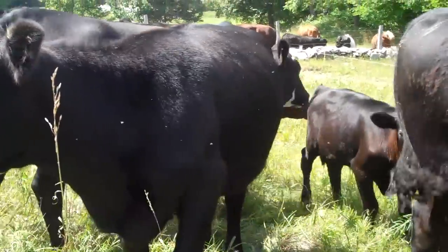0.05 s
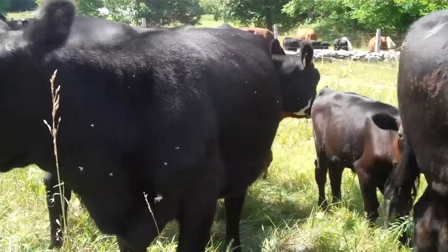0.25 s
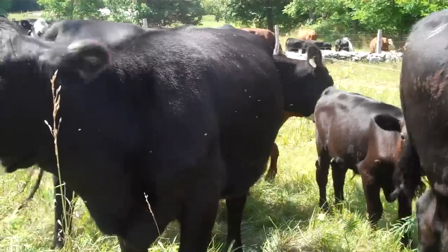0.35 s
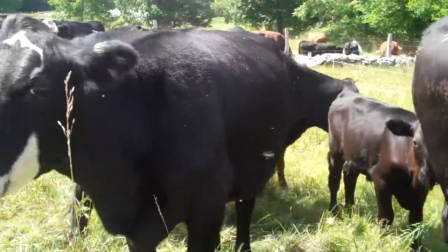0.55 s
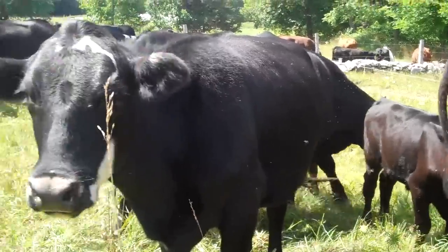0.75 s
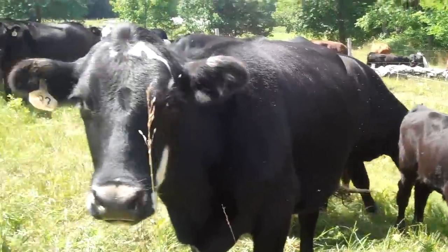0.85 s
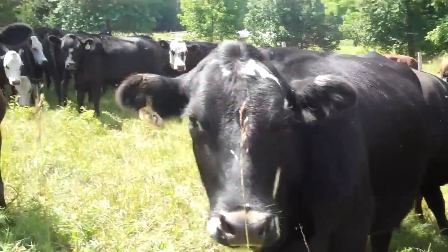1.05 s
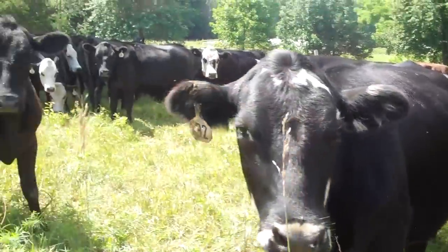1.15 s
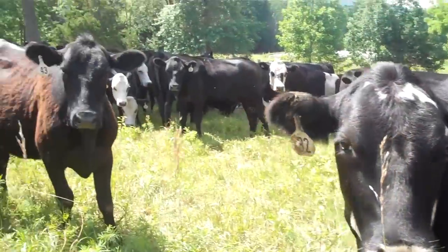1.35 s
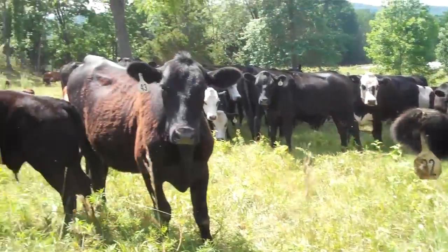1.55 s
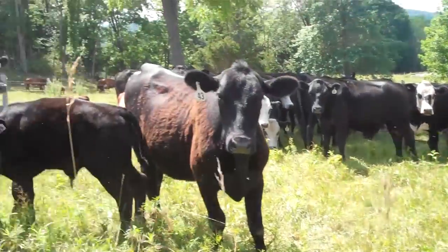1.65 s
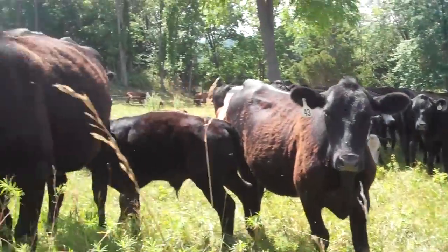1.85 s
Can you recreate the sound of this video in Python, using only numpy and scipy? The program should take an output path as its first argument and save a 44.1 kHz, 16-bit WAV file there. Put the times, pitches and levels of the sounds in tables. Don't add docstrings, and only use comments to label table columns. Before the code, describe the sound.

A close cow moos once, starting low and nasal, opening into a loud held note, then falling with a creak; a second cow bellows high and breaks to a hum; open pasture, stereo microphones.

```python
import sys
import numpy as np
from scipy import signal
from scipy.fft import rfft, irfft
from scipy.io import wavfile
from scipy.ndimage import uniform_filter1d

SR = 44100
rng = np.random.default_rng(int(sys.argv[2]) if len(sys.argv) > 2 else 0)


def store_pcm(level_fs):
    pcm = np.round(np.clip(level_fs, -1, 1) * 32767).astype(np.int16)
    wavfile.write(sys.argv[1], SR, np.atleast_2d(pcm).T)


def field_ratio(decibels):
    return 10 ** (np.asarray(decibels, dtype=float) / 20)


N = 83790


def evened(x):
    return x / np.sqrt(np.mean(x ** 2) + 1e-20)


def read(points, hz):
    f, value = np.transpose(points)
    return np.interp(np.log(hz + 1), np.log(f + 1), value)


def curve(table, column=1):
    rows = np.array(table)
    return np.interp(np.arange(N) / SR, rows[:, 0], rows[:, column])


def progress(start, length):
    return np.clip((np.arange(N) / SR - start) / length, 0, 1)


def resonate(x, hz, width):
    turn = np.exp(2j * np.pi * np.cumsum(hz * np.ones(len(x))) / SR)
    r = np.exp(-np.pi * width / SR)
    return 2 * (turn * signal.lfilter([1 - r], [1, -r], x / turn)).real


def formant(drive, hz, width, first_width):
    return resonate(resonate(drive, hz, first_width), hz, width) * np.sqrt(200 / width)


def ports(x, lag_ms, pan_db):
    hz = np.fft.rfftfreq(2 * N, 1 / SR)
    late = irfft(rfft(x, 2 * N) * np.exp(-2j * np.pi * hz * lag_ms / 1000))[:N]
    return np.array([x * field_ratio(pan_db / 2), late * field_ratio(-pan_db / 2)])


def folds(hz, rough, jitter, count):
    wobble = evened(uniform_filter1d(rng.standard_normal(len(hz)), 300))
    turns = np.cumsum(hz * (1 + jitter * wobble)) / SR
    pulses = sum(np.cos(2 * np.pi * k * turns) * (k * hz < 9500) for k in range(1, count))
    pulses = pulses / np.sqrt(np.minimum(count, 9500 / hz) / 2)
    puffs = (0.42 + np.exp(-(turns % 1) / 1.1)) * rng.standard_normal(len(hz))
    rough = np.clip(rough, 0, 1)
    return (1 - rough) * pulses + rough * evened(puffs)


def throat(drive, rows):
    out = 0
    for k, (hz, width, db) in enumerate(rows):
        out = out + (-1) ** k * field_ratio(db) * formant(drive, hz, width, first_width=width)
    return evened(out)


def calls(table, rows, rough):
    out = 0
    for start, length, first_hz, last_hz, db in table:
        u = progress(start, length)
        pitch = first_hz + (last_hz - first_hz) * u
        voice = throat(folds(pitch, rough, 0.01224, count=10), rows)
        out = out + field_ratio(db) * voice * np.sin(np.pi * u) ** 0.46
    return out


# frequency in Hz, left-right likeness from -1 to 1.
LIKENESS = [(60, 1), (370, 0.96), (2220, 0.84), (13500, -0.74)]


def hiss(colour, patchy_db, same=None):
    frames, hz = N // 128 + 5, np.fft.rfftfreq(512, 1 / SR)
    a, b, c, d, patches = rng.standard_normal((frames, 257, 5)).T
    patches = uniform_filter1d(patches, size=8, axis=0)
    patches = evened(uniform_filter1d(patches, size=24, axis=1))
    same = read(LIKENESS, hz) if same is None else same + 0 * hz
    same = np.clip(same, -1, 1)[:, None]
    left, other = a + 1j * b, c + 1j * d
    z = np.array([left, same * left + np.sqrt(1 - same ** 2) * other])
    z *= field_ratio(read(colour, hz)[:, None] + patchy_db * patches)
    return evened(signal.istft(z, nperseg=512, noverlap=384)[1][:, :N])


# frequency in Hz, level in dB per Hz.
FIELD_COLOUR = [(15, -49), (25, -21.5), (264, -9.5), (780, -16), (891, -13), (1590, -23), (14000, -33.5)]


def field():
    return field_ratio(-52.5) * hiss(FIELD_COLOUR, patchy_db=2.2)


# time in seconds, level in dB.
GRASS_LEVEL = [(0, -45.5), (.3, -38.5), (.6, -39), (.73, -42.5), (.76, -48), (1.05, -44), (1.15, -60),
               (1.6, -60), (1.9, -51.5)]
# frequency in Hz, level in dB per Hz.
GRASS_COLOUR = [(700, -4), (1500, -2), (3000, -2), (8000, -3.5), (11000, -10.5), (14000, -33)]


def grass():
    return field_ratio(curve(GRASS_LEVEL)) * hiss(GRASS_COLOUR, patchy_db=2.2, same=0.26)


# time in seconds, level in dB.
HERD_LEVEL = [(0, -53), (.12, -54), (1.1, -58), (1.45, -72.5), (1.7, -49.5), (1.9, -46)]
# frequency in Hz, level in dB per Hz.
HERD_COLOUR = [(60, -45), (150, -0.5), (450, 1), (1000, 1), (2500, -15), (6000, -61)]


def herd():
    return field_ratio(curve(HERD_LEVEL)) * hiss(HERD_COLOUR, patchy_db=2.2)


# time in seconds, level in dB.
WIND_LEVEL = [
    (0, -50),
    (.45, -68),
    (.6, -88),
]


def wind():
    rumble = resonate(rng.standard_normal(N), 50, 40)
    return field_ratio(curve(WIND_LEVEL)) * evened(rumble + .5 * resonate(rumble, 25, 30))


# start in seconds, length in seconds, first and last pitch in Hz, level in dB.
FIRST_GRUNT = [(-0.0242, 0.103, 103.3, 190, -36.5)]
# resonance in Hz, width in Hz, level in dB.
FIRST_THROAT = [(160, 104, -6), (280, 160, -23)]
# start in seconds, length in seconds, first and last pitch in Hz, level in dB.
GRUNTS = [
    (1.7, 0.083, 110, 150, -50.5),
    (1.765, 0.059, 136.7, 142.5, -39.5),
    (1.82, 0.067, 150, 174, -57.5),
]
# resonance in Hz, width in Hz, level in dB.
GRUNT_THROAT = [(150, 230, -0.5), (280, 47, 2), (635, 58, -2), (1034, 97, -12)]


def grunts():
    return calls(FIRST_GRUNT, FIRST_THROAT, rough=0.14) + calls(GRUNTS, GRUNT_THROAT, rough=0.18)


# time in seconds, pitch in Hz.
MOO = [
    (.04, 98.76),
    (.26, 114.7),
    (.48, 140.3),
    (.7, 162.3),
    (.79, 166.4),
    (.9, 165.6),
    (.97, 156.6),
    (1.035, 138.7),
    (1.11, 101.3),
]
# time in seconds, level in dB.
EFFORT = [
    (.04, -46.5),
    (.2, -32.5),
    (.36, -22.5),
    (.55, -13),
    (.92, -16),
    (.97, -18.5),
    (1.02, -22),
    (1.085, -29.5),
    (1.125, -53),
]
# shut, half open and wide resonance in Hz, width in Hz, then level through the
# nose, half open and wide in dB.
THROAT = [(113, 178, 42, 164, -1.5, -22, -35), (272, 320, 358, 107, 0.5, -1.5, -6),
          (630, 590, 547, 264, -2.5, -7.5, -4.5), (1080, 1009, 910, 104, 1.5, -1.5, 4.5),
          (1620, 1510, 1512, 116, -8.5, -1.5, 0.5), (1730, 1912, 1937, 96, -11, 0, 8),
          (3400, 2610, 2537, 92, 7, -2.5, -1), (2340, 3070, 3025, 152, -2, -0.5, -4),
          (3550, 3600, 3370, 92, -14, -35, -6.5), (3950, 3714, 3800, 101.5, -2.5, -3.5, -5),
          (4520, 4370, 4290, 180, -2, -15.5, -6)]
# resonance in Hz, level in dB.
CLOSING = [(120, -29.5), (380, 2), (600, -18), (950, 0), (1480, -10), (1930, 5.5), (2550, -9), (3080, 4),
           (3400, -11), (3900, -5), (4350, -20.5)]
# opening, top and shifted
# resonance in Hz, width in Hz, climbing and shifted level in dB.
BRIGHT = [(4650, 5300, 4660, 170, -21.5, -17.5), (5230, 4500, 5370, 210, -13.5, -21),
          (5600, 5850, 5200, 310, -20.5, -42), (6070, 5900, 6250, 120, -25, -22),
          (6750, 7110, 6700, 270, -17.5, -23), (7500, 7700, 7400, 310, -34, -28.5),
          (8040, 8900, 8200, 680, -28, -28.5)]


def moo():
    t = np.arange(N) / SR
    open_s, open_rise_s = 0.363, 0.015
    creak = progress(1.03, .07)
    pitch = uniform_filter1d(curve(MOO), size=2600)
    drive = folds(pitch, .05 + .3 * creak, .0015 * (1 + 10 * creak), count=90)
    slide = progress(.12, open_s - .12)
    wide, closing = progress(.42, 0.41), progress(0.911, 0.14)
    wander = rng.standard_normal((len(THROAT), N))
    wander = 1.8 * evened(uniform_filter1d(uniform_filter1d(wander, size=2000), size=2000))

    def opening(hz):
        return progress(open_s, open_rise_s * (1 + (hz / 1890) ** 4)) ** .5

    out = 0
    for k, (shut, half, full, width, nasal_db, half_db, wide_db) in enumerate(THROAT):
        closed_hz, closed_db = CLOSING[k]
        hz = shut + (half - shut) * slide + (full - half) * wide + (closed_hz - full) * closing
        db = nasal_db + (half_db - nasal_db) * opening(half) + (wide_db - half_db) * wide
        db = db + (closed_db - wide_db) * closing + wander[k]
        out = out + (-1) ** k * field_ratio(db) * formant(drive, hz, width, 4.1 * width)

    shift_s = .72
    climb, shifted = progress(open_s, shift_s - open_s), progress(shift_s, 0.066)
    bright_opened = opening(THROAT[-1][1])
    for k, (first, top, last, width, climb_db, shifted_db) in enumerate(BRIGHT):
        hz = first + (top - first) * climb + (last - top) * shifted
        gain = bright_opened * field_ratio(climb_db + (shifted_db - climb_db) * shifted + wander[k])
        out = out - (-1) ** k * gain * formant(drive, hz, width, 3.1 * width)

    out = out - .85 * wide * (1 - closing) * resonate(out, pitch, 30)
    out = out / np.sqrt(uniform_filter1d(out ** 2, size=2500) + 1e-9)
    nasal_db = -5.5 * (1 - progress(open_s, open_rise_s))
    fade = np.clip((EFFORT[-1][0] - t) / 0.014, 0, 1)
    return out * field_ratio(curve(EFFORT) + nasal_db) * (t > EFFORT[0][0]) * fade


# frequency in Hz, lag of the right port in radians, left over
# right level in dB.
SHADOW = [(60, 0, -1), (700, .6, -1.3), (2300, 1.5, -.5), (3100, 2.4, -3), (4500, 3.6, 2), (6700, 5.1, 3.5),
          (8300, 5.2, 2.5), (10000, 6.7, -6)]


def shadowed(x):
    hz, (f, lag, pan_db) = np.fft.rfftfreq(2 * N, 1 / SR), np.transpose(SHADOW)
    half = field_ratio(np.interp(hz, f, pan_db) / 2)
    paths = np.array([half, np.exp(-1j * np.interp(hz, f, lag)) / half])
    direct = irfft(rfft(x, 2 * N) * paths)[:, :N]
    t = np.arange(SR // 20) / SR
    echo = rng.standard_normal((2, len(t))) * field_ratio(-60 * t / .03) * (t > .001)
    treble = signal.butter(4, 3300, "high", fs=SR, output="sos")
    echo = signal.sosfilt(treble, echo / np.linalg.norm(echo[0]))
    return direct + field_ratio(-6.5) * signal.fftconvolve(direct, echo, axes=1)[:, :N]


# start in seconds, length in seconds, first and last pitch in Hz, level in dB.
LOWS = [
    (.06, 0.058, 314.3, 332, -44.5),
    (1.1, 0.227, 313, 299.8, -60.5),
    (1.3, 0.17, 338, 324, -61.5),
    (1.79, 0.0605, 280, 340, -47.5),
    (1.845, 0.05, 321, 306, -46),
]
# resonance in Hz, width in Hz, level in dB.
LOW_THROAT = [(396, 94, 0), (640, 250, -5), (930, 220, 1), (1560, 300, -19), (1950, 400, -19)]
# start in seconds, length in seconds, first and last pitch in Hz, level in dB.
FAR_LOWS = [
    (1.44, 0.13, 239.3, 198.7, -62.5),
    (1.54, .18, 215, 246.7, -55.5),
    (1.665, 0.05, 185, 177, -50),
    (1.71, 0.048, 186.8, 195, -58.5),
]
# resonance in Hz, width in Hz, level in dB.
FAR_THROAT = [(397, 110, 3.5), (785, 200, -1), (1264, 170, -19)]


def far_cattle():
    return calls(LOWS, LOW_THROAT, rough=.35) + calls(FAR_LOWS, FAR_THROAT, rough=.45)


# time in seconds, pitch in Hz, level in dB.
HIGH = [(.1, 520, -52), (.135, 573.6, -42.5), (.16, 578, -34), (.24, 573.6, -31), (.34, 571.5, -30.5),
        (.38, 576, -25.5), (.43, 582, -33.5), (.445, 583, -25.5), (.46, 570, -25.5)]
# resonance in Hz, width in Hz, level in dB.
HIGH_THROAT = [(584, 240, 1.5), (1230, 400, -1.5), (1800, 360, -9.5), (2210, 250, -11.5)]
# time in seconds, pitch in Hz, level in dB.
HUM = [(.46, 280, -49), (.5, 260, -43), (.535, 222, -27), (.575, 202, -29.5), (.64, 201, -30),
       (.72, 222.2, -36.5), (.84, 208, -40), (.885, 152, -25), (.915, 124.2, -54)]
# resonance in Hz, width in Hz, level in dB.
HUM_THROAT = [(239, 65, -17.5)]
# start in seconds, length in seconds, first and last pitch in Hz, level in dB.
BREAKS = [
    (.34, 0.076, 309, 320, -39),
    (.45, 0.12, 269.3, 264.3, -34.5),
]
# resonance in Hz, width in Hz, level in dB.
BREAK_THROAT = [(809, 280, 0.5), (928, 100, -1.5), (1175, 200, 0)]


def second_cow():
    t, out = np.arange(N) / SR, calls(BREAKS, BREAK_THROAT, rough=.7)
    for table, rows, rough in ((HIGH, HIGH_THROAT, .12), (HUM, HUM_THROAT, .15)):
        on = (t > table[0][0]) & (t < table[-1][0])
        voice = throat(folds(curve(table), rough, .011, count=12), rows)
        out = out + voice * field_ratio(curve(table, column=2)) * uniform_filter1d(on * 1., 400)
    return out


# time in seconds, thud level in dB, thud pitch in Hz, swish level in dB.
STEPS = [
    (1.403, -46, 135, -50),
    (.722, -70, 120, -42),
]


def steps():
    t, thud, swish = np.arange(N) / SR, 0, 0
    for s, thud_db, hz, swish_db in STEPS:
        thud = thud + field_ratio(thud_db) * np.exp(-((t - s) / 0.01) ** 2) * np.sin(2 * np.pi * hz * (t - s))
        swish = swish + field_ratio(swish_db) * np.exp(-((t - s) / .016) ** 2)
    return thud + swish * hiss(GRASS_COLOUR, patchy_db=0, same=0.3)


def pasture(x):
    t = np.arange(SR // 3) / SR
    tail = rng.standard_normal((2, len(t))) * field_ratio(-60 * t / 0.11) * (t > .004)
    tail = signal.lfilter([.3], [1, -.7], tail[0] + 0.04 * tail)
    return signal.fftconvolve(x[None], tail / np.linalg.norm(tail[0]), axes=1)[:, :N]


def scene():
    beds = field() + grass() + herd() + wind()
    grunting, near, far, second = grunts(), moo(), far_cattle(), second_cow()
    voices = shadowed(near) + ports(second, 0.019, -3.0)
    voices = voices + ports(far, -0.02, -3.4) + ports(grunting, 0.033, -2.2)
    scatter = field_ratio(-22) * pasture(near + second) + field_ratio(-5.0) * pasture(far)
    return voices + scatter + beds * field_ratio([[-1.1], [1.1]]) + steps()


def low_pass(x):
    return signal.sosfilt(signal.butter(12, 14120, fs=SR, output="sos"), x)


def record(dry):
    over = np.maximum(abs(dry) - .82, 0)
    limited = dry - np.sign(dry) * (over - .15 * np.tanh(over / .15))
    return low_pass(limited)


dry = scene()
out = record(dry)
store_pcm(out)
```